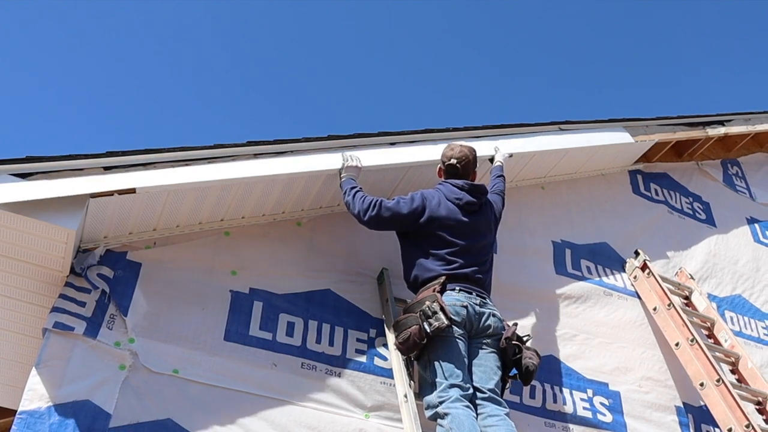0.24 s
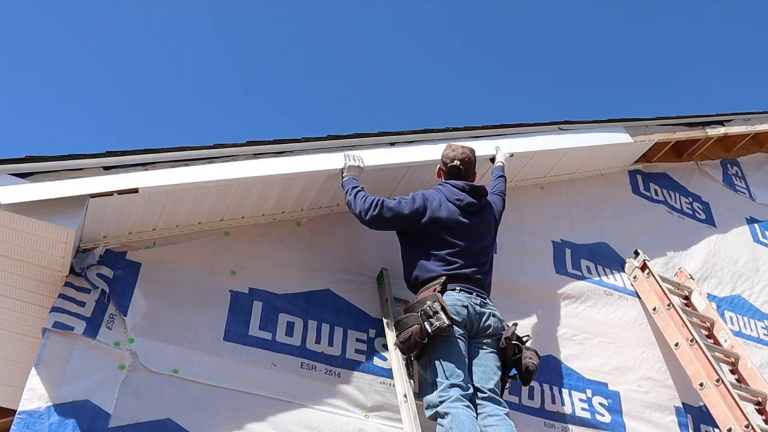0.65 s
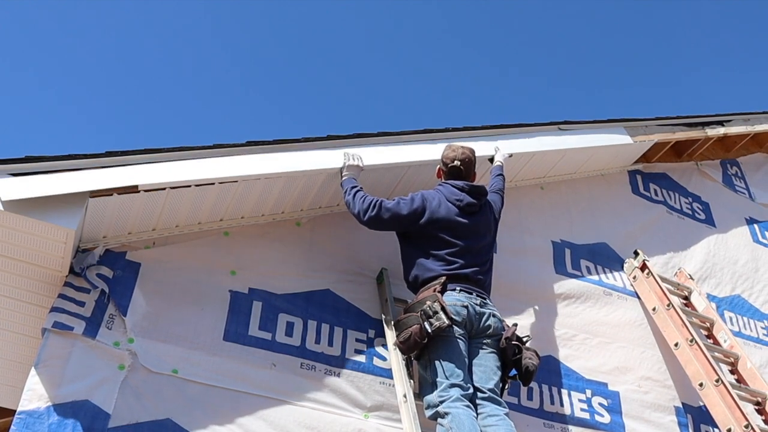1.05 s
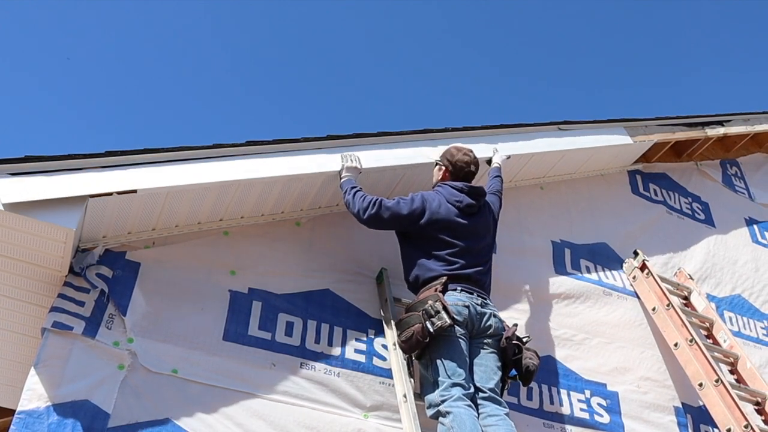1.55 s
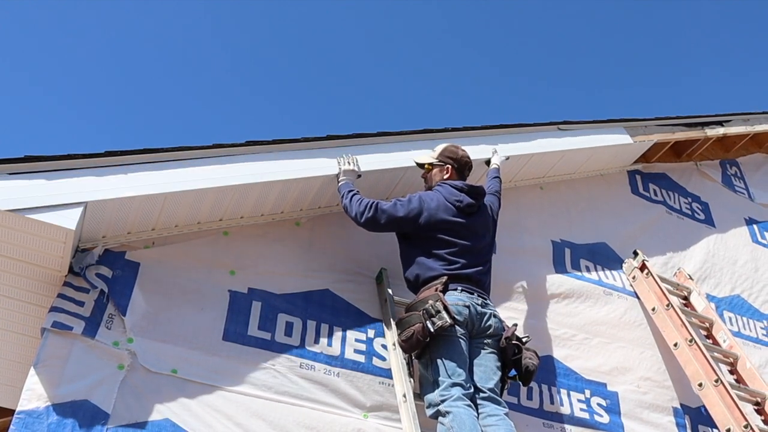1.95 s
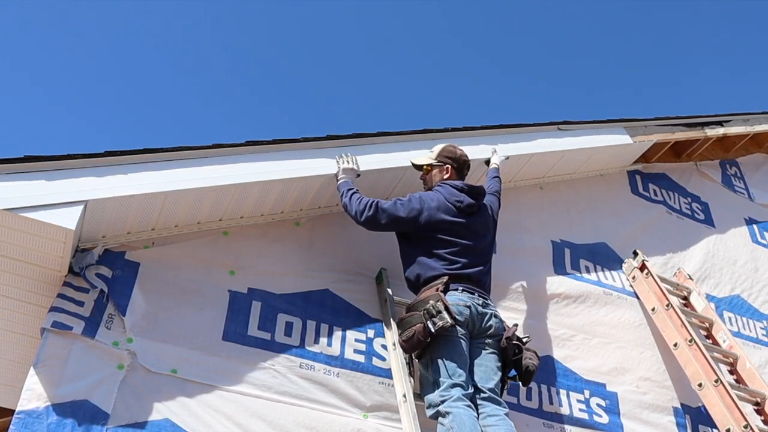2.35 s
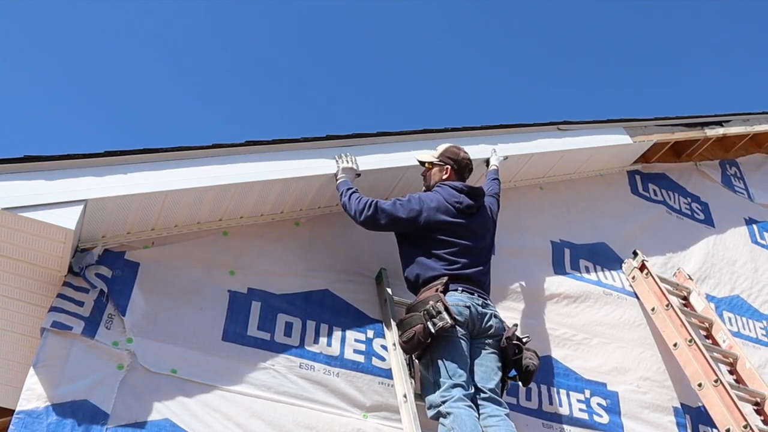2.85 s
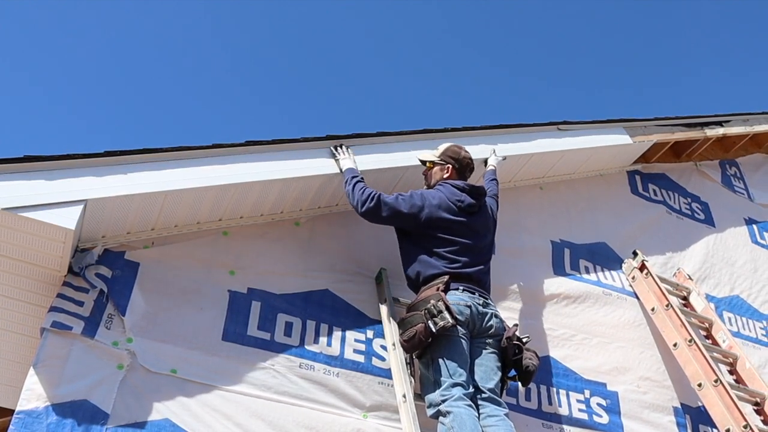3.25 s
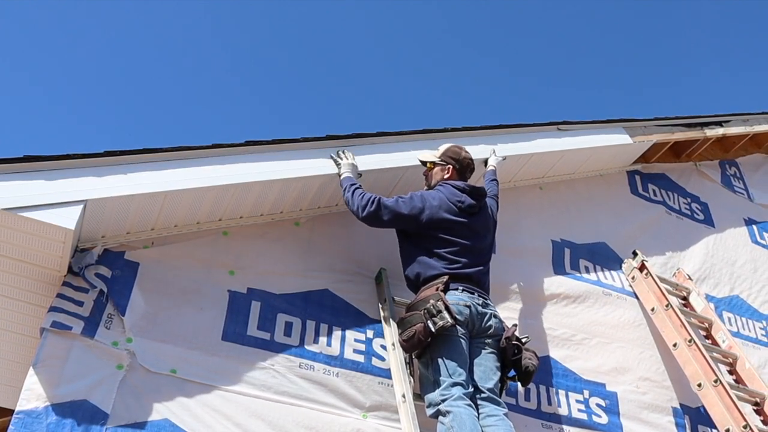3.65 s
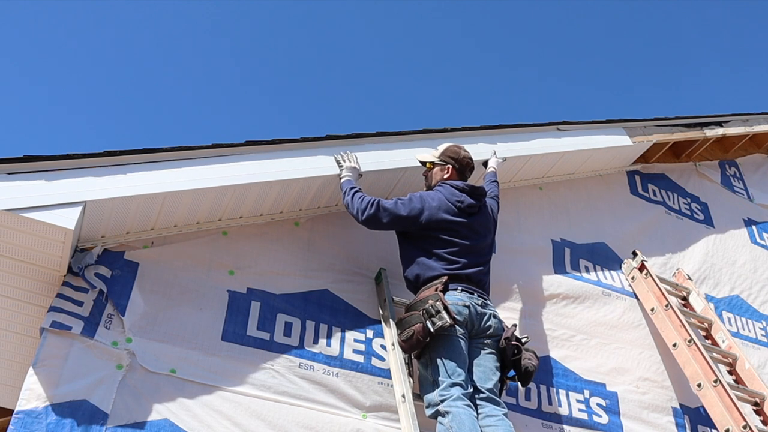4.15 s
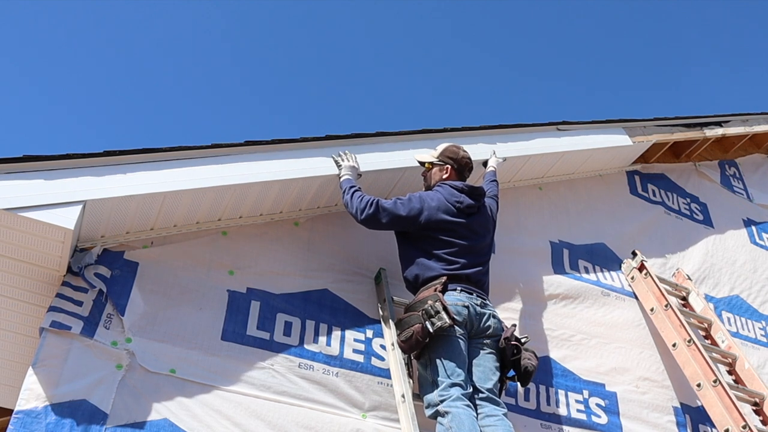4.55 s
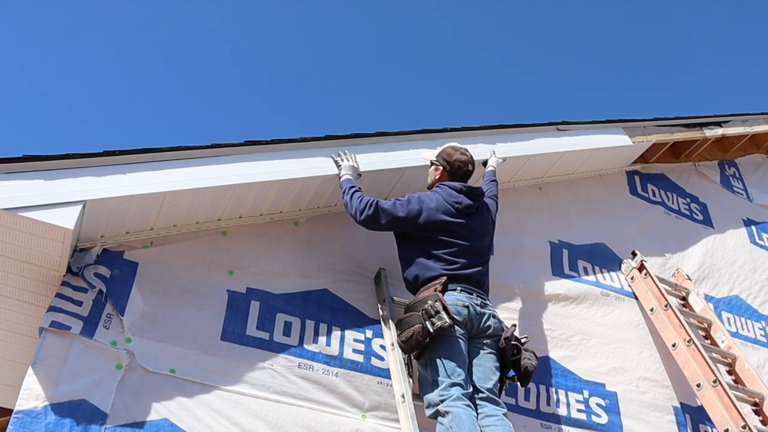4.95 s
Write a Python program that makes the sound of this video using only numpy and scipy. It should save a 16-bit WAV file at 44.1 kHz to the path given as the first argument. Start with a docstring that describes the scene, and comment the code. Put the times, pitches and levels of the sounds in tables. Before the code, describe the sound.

Outdoors, wind buffets the microphone in soft, low lumps throughout while a thin aluminium strip is handled a few metres away. It begins with faint gritty rubbing and small clicks at 0.1-0.25 s, a firmer tick near 0.5, then the hardest snap at 0.63: a dry, very short clank, a fast wobble falling in pitch, and a brief rub. Irregular ticks and slips continue, stronger around 1.25 and 1.4, where the face gives a low pop. From 1.7 to 2.6 the contacts are mostly small and thin, then a crisp click lands at 2.65, with hollow rising pops around 2.35-3.1. Around 3.1-3.4 it is nearly quiet. A rub swells from 3.85 and cuts off near 4.0; sliding grows into a bright, sharp click at 4.28 and another at 4.34. Low and hollow pops follow around 4.5, with clicks at 4.66 and 5.05. Each metal hit has a short, faint wall echo.

```python
"""Wind rumbles in low lumps on the microphone while sheet metal scrapes, a few metres away.
A long strip of thin aluminium is pressed and slid into place under the eaves of a house.
Its edge clicks, slips and rubs on the trim: shaped noise driving the hollow, the metal and the bright edge.
A hard snap clanks in decaying tones, the strip flexes with a falling wobble, and its face pops
in rising tones. Wall and ground answer the metal with a short echo of decaying noise."""
import sys
import numpy as np
from scipy import signal
from scipy.fft import rfft, irfft, next_fast_len
from scipy.io import wavfile
from scipy.ndimage import map_coordinates

SR = 44100
rng = np.random.default_rng(int(sys.argv[2]) if len(sys.argv) > 2 else 0)


def persist_wave(psi):
    """Save psi, clipped to +-1, as 16-bit WAV."""
    counts = np.round(np.clip(psi, -1, 1) * 32767).astype(np.int16)
    wavfile.write(sys.argv[1], SR, np.atleast_2d(counts).T)


N = 229224  # samples, about 5.2 s

# Levels are drive levels, before onsets, unevenness and resonances shape them.
# wind strength at the microphone: time_s, buffet_db
WIND_STRENGTH = [(0.0, -49), (0.06, -42.5), (0.11, -48.5), (0.48, -43.5), (0.64, -49), (1.45, -41.5),
                 (2.2, -49.5), (2.39, -43), (2.49, -63.5), (2.65, -44.5), (2.72, -56.5), (3.03, -53),
                 (3.27, -47.5), (3.4, -66), (3.45, -47), (3.55, -54), (3.63, -41), (3.82, -57.5),
                 (3.88, -39), (4.18, -50.5), (4.65, -39), (4.76, -46), (4.79, -58), (4.86, -36),
                 (5.01, -53), (5.05, -45), (5.2, -49)]
# colour of the wind rumble: pitch_hz, relative_db
RUMBLE_COLOUR = [(16, -33), (28, -7), (75, 2), (113, 1), (177, -6), (320, -15), (420, -34), (700, -120)]
# steady rubbing as the strip slides: time_s, scrape_db, hiss_db, panel_db
SLIDE_LEVELS = [(0.0, -59, -69.5, -56.5), (0.56, -54.5, -69.5, -54), (0.98, -62.5, -74, -59),
                (1.29, -70.5, -72.5, -63), (1.63, -64.5, -80, -57.5), (1.78, -74, -80, -63),
                (2.01, -63.5, -75, -53), (2.19, -63.5, -77, -58), (2.49, -63, -74, -57),
                (2.78, -70, -78, -57), (3.2, -63.5, -74, -59), (3.39, -62.5, -76, -59),
                (3.71, -59.5, -72.5, -52.5), (4.08, -58, -70, -52), (4.37, -52, -67, -46),
                (4.47, -59, -78, -60), (4.72, -68, -78.5, -56), (5.2, -64.5, -75, -52.5)]
# contacts of the sheet's edge: start_s, level_db, thump_rel_db, edge_hiss_rel_db, ring_hz, slip_t60_s
EDGE_CONTACTS = [(0.1074, -35, -25, -9, 2260, 0.09), (0.1988, -33.5, -21, -14, 1760, 0.12),
                 (0.227, -35.5, -29, -1.5, 1940, 0.023), (0.2412, -32.5, -16, -7.5, 1670, 0.061),
                 (0.427, -36.5, -12, -12, 2440, 0.11), (0.484, -26.5, -10.5, -15.5, 1360, 0.11),
                 (0.6262, -14, -11.5, -19.5, 2430, 0.05), (0.7646, -38, -13, -7, 1940, 0.14),
                 (0.852, -39, -14, -13, 2520, 0.1), (0.955, -40, -26, -19, 2670, 0.022),
                 (0.9819, -37, -6, -17.5, 2260, 0.11), (1.026, -38, 1, -22, 2230, 0.02),
                 (1.1564, -32, -5.5, -10, 2230, 0.1), (1.2545, -26, -4, -11.5, 3620, 0.028),
                 (1.4053, -27.5, -5.5, -20, 2200, 0.03), (1.4425, -32, -6, -12, 2260, 0.078),
                 (1.713, -42, -13.5, -8, 2650, 0.12), (1.7435, -40.5, -1.5, -16, 3800, 0.081),
                 (1.7686, -33, -3, -7.5, 2460, 0.081), (1.975, -37.5, 0.5, -13, 2450, 0.072),
                 (1.985, -28, -4.5, -8.5, 2620, 0.099), (2.0512, -44.5, -8, -6, 3380, 0.093),
                 (2.103, -35.5, -4, -11, 3750, 0.023), (2.1778, -43.5, -10, -4.5, 3070, 0.061),
                 (2.2595, -43, -6, -11.5, 3860, 0.21), (2.3473, -38.5, 12, -30, 1480, 0.053),
                 (2.366, -31, -27, -5.5, 3760, 0.021), (2.3864, -41.5, -5, -3, 2660, 0.047),
                 (2.4001, -39, 3.5, -14, 1560, 0.044), (2.641, -39, 1.5, -7, 3670, 0.039),
                 (2.6531, -19.5, -1.5, -19, 2180, 0.015), (2.708, -43.5, 2, -13, 3830, 0.048),
                 (2.8639, -30.5, 4.5, -41, 1490, 0.064), (2.9329, -45, 6, -13, 1280, 0.16),
                 (3.0113, -37.5, 0, -23, 1300, 0.049), (3.4244, -41, 0.5, -3.5, 4280, 0.063),
                 (3.4435, -38, -4, -15, 3130, 0.059), (3.461, -34.5, 1, -9, 1290, 0.17),
                 (3.5374, -38, -7.5, -4.5, 4260, 0.075), (3.5712, -42.5, -3, -6.5, 3800, 0.1),
                 (3.613, -44, 1.5, -7, 3470, 0.037), (3.7856, -40, -7.5, -9, 2700, 0.11),
                 (3.8255, -41, -7, -16, 1400, 0.11), (4.0919, -46.5, 10, -21, 1440, 0.017),
                 (4.124, -30.5, -6, -6, 2980, 0.076), (4.1689, -34, -7.5, -6, 1359, 0.054),
                 (4.1937, -36.5, -8.5, -9, 3090, 0.083), (4.2168, -43.5, -28, -4, 4230, 0.34),
                 (4.2527, -27, -10, -9, 2880, 0.034), (4.2752, -15, -19, -10, 3080, 0.042),
                 (4.342, -22, -9.5, -15, 4400, 0.079), (4.444, -48, -3, -4, 3580, 0.055),
                 (4.4777, -31.5, 3.5, -36, 1480, 0.071), (4.5128, -37.5, -5, -7.5, 4200, 0.061),
                 (4.5325, -47, 11.5, -29, 1300, 0.1), (4.659, -24, -6.5, -11, 2600, 0.059),
                 (4.7467, -40.5, -4, -5, 3600, 0.097), (4.855, -42.5, -1, -8.5, 1570, 0.058),
                 (4.9045, -49.5, 6, -10, 2500, 0.15), (4.9626, -39, 1, -13.5, 2390, 0.035),
                 (4.975, -30.5, -5, -7.5, 2700, 0.084), (5.0539, -24, -11, -14.5, 2760, 0.15),
                 (5.1826, -33, -12, -11, 2930, 0.049)]
# long rubs along the trim; one row ends before its peak, so its swell cuts off:
# start_s, peak_s, end_s, level_db, edge_hiss_rel_db, singing_hz, singing_rel_db
TRIM_RUBS = [(0.312, 0.346, 0.45, -48.5, -10, 2320, -22), (0.631, 0.676, 0.85, -49, -7.5, 2430, -10),
             (1.545, 1.593, 2, -72, -1.5, 2350, 1), (2.416, 2.49, 2.76, -66, -2, 2600, -0.5),
             (3.127, 3.304, 3.39, -66.5, 3.5, 3770, 5), (3.846, 4.014, 3.983, -45, 1, 2514, -4.5)]
# modes of the hardest snap: pitch_hz, level_db, t60_s
CLANK_MODES = [(475, -22, 0.027), (730, -21, 0.033), (2144, -10.5, 0.021), (2530, -16.5, 0.025),
               (2680, -20, 0.027)]
# the buckle's wobble: time_s, pitch_hz, level_db
FLEX_WOBBLE = [(0.639, 480, -62), (0.661, 383, -37.5), (.685, 296, -33.5), (0.7, 243, -38.5),
               (.71, 243, -76)]
# the flat face pops in and out under a glove: start_s, level_db, start_pitch_hz, t60_s
FACE_DENTS = [(1.408, -26.5, 310, 0.05), (2.348, -35, 954, 0.05), (2.659, -42, 1006, .1),
              (2.864, -30, 980, .04), (2.938, -38, 1160, 0.055), (2.943, -38, 190, 0.06),
              (3.011, -44, 1020, 0.11), (3.065, -42.5, 1027, 0.055), (4.479, -39, 1003, 0.15),
              (4.537, -38.5, 1088, 0.074), (4.544, -24, 191, 0.051), (4.564, -43.5, 990, 0.068)]
# hollow behind the sheet: pitch_hz, width_hz, relative_db
HOLLOW_MODES = [(228, 100, 10.5), (377, 160, 4), (595, 47, -0.5), (715, 32, -7), (1100, 120, -10.5)]
# bending modes over the spectrum: pitch_hz, width_hz, hanging_free_db, seated_in_trim_db
BENDING_MODES = [(1379, 48, 19, 9), (1710, 41, 27, -10), (2250, 170, 24, -40), (2524, 100, 18, 17),
                 (2700, 43, -22, -29), (3380, 500, -3, 12), (3810, 42, -11, 15), (4160, 370, -13, 8),
                 (5750, 71, 17, 4), (8420, 220, 10.5, 11.5), (9780, 150, -11, 13.5)]
# colour of the scrape: pitch_hz, relative_db
SCRAPE_COLOUR = [(530, -25.5), (900, -24.5), (1300, 1.5), (1850, -2), (2440, -0.5), (4500, -3.5),
                 (7170, -20), (8000, -17), (10400, -50), (17600, -120)]
# colour of the edge hiss: pitch_hz, relative_db
HISS_COLOUR = [(3240, -25.5), (5500, -2.5), (7210, -7.5), (8410, -4.5), (15100, -1.5), (16800, -31)]
# the strip goes into the trim: start_s, end_s
SEATING_TIMES = (1, 1.9)
# wall and ground answer: pitch_hz, t60_s
YARD_DECAY = [(300, 0.33), (2500, 0.18), (12000, 0.034)]

GUST_DB, GUSTS_PER_S = 2.5, 11  # quick swells on top of the slow wind strength
CHATTER_DB, CHATTER_PER_S = 3, 250  # a slip is a run of uneven small touches
# first touch over the slip that follows: harder where the slip is shorter
TICK_DB, TICK_PER_HALVING_DB, USUAL_SLIP_S = 1, 2.5, 0.056
THUMP_HZ, THUMP_SCATTER = 471, 0.16  # middle thump pitch; log spread of the random pitch
CLANK_S = 0.626  # the strip snaps over the lip of the trim
YARD_DB = -16.0  # echo against the direct metal
TOP_HZ = 16800  # upper limit of the sound


def amp(db):
    """Decibels to amplitude."""
    return 10 ** (np.asarray(db) / 20)


def unit(x):
    """x scaled to an RMS of 1."""
    return x / np.sqrt(np.mean(x ** 2) + 1e-20)


def along(points, hz):
    """Value at hz between (pitch_hz, value) points on a log axis."""
    f, v = np.transpose(points)
    return np.interp(np.log(hz + 1), np.log(f + 1), v)


def curves(rows):
    """One value per sample for each column after the time."""
    s, *cols = np.transpose(rows)
    return [np.interp(np.arange(N) / SR, s, c) for c in cols]


def wobble(rate):
    """A smooth random curve with rate knots a second."""
    knots = rng.standard_normal(int(N * rate / SR) + 4)
    return map_coordinates(knots, [np.arange(N) * rate / SR])


def bumps(modes, hz):
    """Summed magnitude of (pitch_hz, width_hz, level_db) resonances."""
    return sum(amp(db) * hz * w / np.hypot(c * c - hz * hz, hz * w) for c, w, db in modes)


def coloured(x, gain, size=8192):
    """x through the causal minimum-phase filter of energy 1 whose magnitude follows gain(hz)."""
    cepstrum = irfft(np.log(gain(np.fft.rfftfreq(size, 1 / SR)) + 1e-6), size)
    cepstrum[1:size // 2] *= 2
    cepstrum[size // 2 + 1:] = 0
    taps = irfft(np.exp(rfft(cepstrum)), size)[:size // 2]
    return signal.fftconvolve(x, taps / np.linalg.norm(taps))[:N]


def grit(rate, spread_db):
    """Friction force: noise whose strength varies from one surface grain to the next."""
    return unit(rng.standard_normal(N) * amp(spread_db * wobble(rate)))


def ring(hz, t, q):
    """An unsteady tone: noise in a resonance, as several close modes beat."""
    b, a = signal.iirpeak(hz, q, SR)
    noise = rng.standard_normal(2 * len(t))
    return unit(signal.lfilter(b, a, noise)[len(t):])  # first half lets the resonance build up


def wind():
    """Eddies hit the microphone as short low lumps of noise."""
    buffet_db, = curves(WIND_STRENGTH)
    rumble = coloured(rng.standard_normal(N), lambda hz: amp(along(RUMBLE_COLOUR, hz)))
    eddies = unit(amp(2.45 * wobble(25)) * rumble)
    return amp(buffet_db + GUST_DB * wobble(GUSTS_PER_S)) * eddies


def slide():
    """Steady friction forces on the hollow, the sheet and its edge, with burrs that catch."""
    scrape_db, hiss_db, panel_db = curves(SLIDE_LEVELS)
    grip_db = 2.5 * wobble(22)  # the grip of the gloves is uneven
    push = np.array([amp(panel_db + 0.24 * grip_db) * grit(60, spread_db=6.0),
                     amp(scrape_db + grip_db) * grit(300, spread_db=4.0),
                     amp(hiss_db + grip_db) * grit(400, spread_db=2.0)])
    caught = rng.random(N) < 30 / SR  # about 30 burrs a second
    burrs = caught * amp(scrape_db + 20.5 + 4.9 * rng.standard_normal(N))
    push[1:] += burrs * amp([[0], [-5]])
    return push


def contacts():
    """Each edge contact is a hard first tick and a decaying slip; returns forces and local ringing."""
    push, rings = np.zeros((3, N + SR)), np.zeros(N + SR)
    t = np.arange(SR // 5) / SR
    chatter = np.pad(amp(CHATTER_DB * wobble(CHATTER_PER_S)), (0, SR))
    # each thump gets a random pitch near THUMP_HZ
    thump_pitches = THUMP_HZ * np.exp(THUMP_SCATTER * rng.standard_normal(len(EDGE_CONTACTS)))
    for (s, db, thump_db, edge_db, hz, t60), thump_hz in zip(EDGE_CONTACTS, thump_pitches):
        here = slice(round(s * SR), round(s * SR) + len(t))
        slip = amp(-60 * t / t60) * (1 - np.exp(-t / 0.0029)) * chatter[here]
        tick_db = TICK_DB + TICK_PER_HALVING_DB * np.log2(USUAL_SLIP_S / t60)
        tick = amp(tick_db - 60 * t / 0.0084) * (1 - np.exp(-t / 0.00031))
        levels = amp(db + np.array([[thump_db - 8.0], [-7], [edge_db - 3]]))
        push[:, here] += levels * (slip + tick) * rng.standard_normal((3, len(t)))
        slip_ring = amp(-12.0) * slip * ring(hz, t, q=8.3)
        tick_ring = amp(tick_db - 6.5 - 60 * t / 0.0078) * np.sin(2 * np.pi * hz * t)
        knock = amp(thump_db) * slip * ring(thump_hz, t, q=6.3)
        rings[here] += amp(db) * (slip_ring + tick_ring + knock)
    return push[:, :N], rings[:N]


def rubs():
    """Longer rubs swell on the sheet and its edge, each making one mode sing; forces and ringing."""
    push, rings = np.zeros((3, N)), np.zeros(N)
    grain = amp(0.54 * wobble(200) + 2.75 * wobble(36))
    for start, peak, end, db, edge_db, hz, tone_db in TRIM_RUBS:
        angle = np.interp(np.arange(N) / SR, [start, peak, end], [0, np.pi / 2, np.pi])
        swell = np.sin(angle) ** 2
        push[1:] += amp([[db], [db + edge_db]]) * swell * grain * rng.standard_normal((2, N))
        here = slice(round(start * SR), round(start * SR) + SR // 2)
        rings[here] += amp(db + tone_db) * swell[here] * ring(hz, np.arange(SR // 2), q=41)
    return push, rings


def clank():
    """The hardest snap rings the strip's strongest modes for a few milliseconds."""
    out, t = np.zeros(N), np.arange(SR // 8) / SR
    modes = sum(amp(db - 60 * t / t60) * np.sin(2 * np.pi * hz * t) for hz, db, t60 in CLANK_MODES)
    out[round(CLANK_S * SR):][:len(t)] = modes * (1 - np.exp(-t / 0.00095))
    return out


def flex():
    """A buckle runs along the strip: a skewed, uneven wobble whose pitch falls as the tension eases."""
    hz, db = curves(FLEX_WOBBLE)
    phase = 2 * np.pi * np.cumsum(hz) / SR + 0.15 * wobble(150)
    start, end = FLEX_WOBBLE[0][0], FLEX_WOBBLE[-1][0]
    gate = np.interp(np.arange(N) / SR, [start - 0.01, start, end, end + 0.008], [0, 1, 1, 0])
    wave = np.sin(phase) + 0.3 * np.sin(2 * phase + 1)
    wave = wave + 0.15 * np.sin(3 * phase) + 0.12 * np.sin(4 * phase)
    return np.sqrt(2) * amp(db + 0.98 * wobble(112.5)) * gate * wave


def dents():
    """Each pop rings one hollow mode, which stiffens and rises as the dent springs back."""
    out, t = np.zeros(N), np.arange(SR // 8) / SR
    for s, db, hz, t60 in FACE_DENTS:
        rise = 1 + 0.221 * (1 - np.exp(-t / 0.0154))
        phase = 2 * np.pi * hz * np.cumsum(rise) / SR
        beat = 1 + 0.3 * ring(99, t, q=0.94)
        decay = amp(db - 60 * t / t60) * (1 - np.exp(-t / 0.00095))
        out[round(s * SR):][:len(t)] += decay * beat * np.sin(phase)
    return out


def sheet():
    """The forces sound through the hollow, the bending modes and the bright cut edge."""
    contact_push, contact_rings = contacts()
    rub_push, rub_rings = rubs()
    low, mid, high = slide() + contact_push + rub_push
    # the hollow passes little below 180 Hz or above 1400 Hz
    hollow = coloured(low, lambda hz: bumps(HOLLOW_MODES, hz)
                      * hz ** 2 / (hz ** 2 + 180 ** 2) / (1 + (hz / 1400) ** 4))
    seated = np.interp(np.arange(N) / SR, SEATING_TIMES, [0, np.pi / 2])
    metal = 0
    # crossfade from hanging free to seated in the trim
    for state, share in enumerate([np.cos(seated), np.sin(seated)]):
        state_modes = [(c, w, db[state]) for c, w, *db in BENDING_MODES]
        modes = lambda hz: 2 + 0.5 * bumps(state_modes, hz)
        metal = metal + coloured(share * mid, lambda hz: amp(along(SCRAPE_COLOUR, hz)) * modes(hz))
        metal = metal + coloured(share * high, lambda hz: amp(along(HISS_COLOUR, hz)) * modes(hz))
    return hollow + metal + contact_rings + rub_rings + clank() + flex() + dents()


def yard(x):
    """Wall and ground echo: a noise tail in which each frequency dies at its own speed."""
    hz, t, z = signal.stft(rng.standard_normal(SR // 4), SR, nperseg=256)
    decay = amp(-60 * t / along(YARD_DECAY, hz)[:, None])
    tail = signal.istft(z * decay, SR, nperseg=256)[1]
    late = np.pad(x, (300, 0))  # samples, about 7 ms of travel
    return signal.fftconvolve(late, tail / np.linalg.norm(tail))[:N]


def scene():
    """Wind on the microphone, the metal a few metres off and its echo, in one channel."""
    metal = sheet()
    return (wind() + metal + amp(YARD_DB) * yard(metal))[None]


def record(dry):
    """Nothing sounds above TOP_HZ."""
    m = next_fast_len(N + SR // 2)
    kept = np.fft.rfftfreq(m, 1 / SR) < TOP_HZ
    return irfft(rfft(dry, m) * kept, m)[..., :N]


dry = scene()
out = record(dry)
persist_wave(out)
```